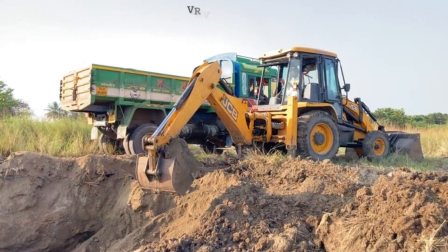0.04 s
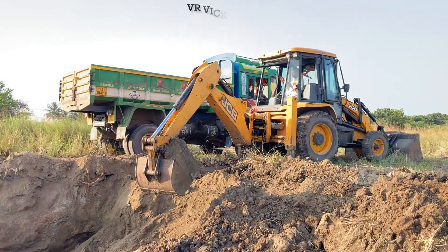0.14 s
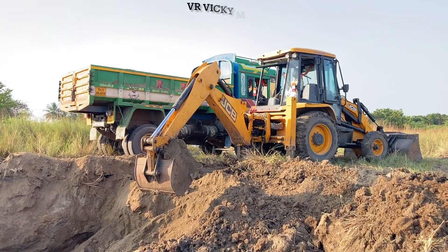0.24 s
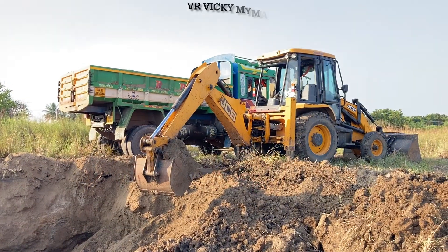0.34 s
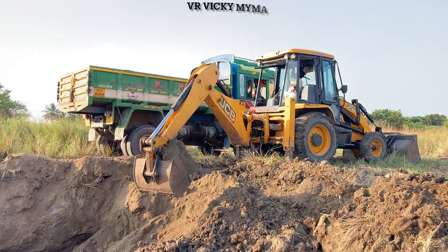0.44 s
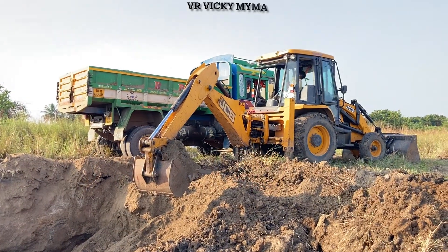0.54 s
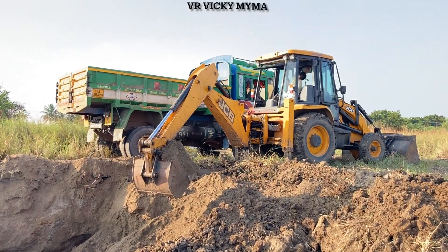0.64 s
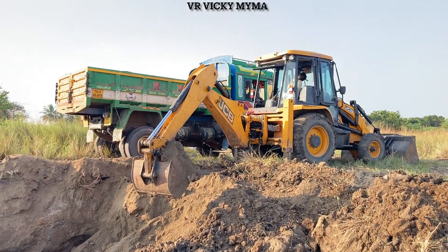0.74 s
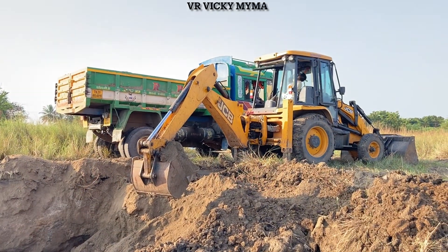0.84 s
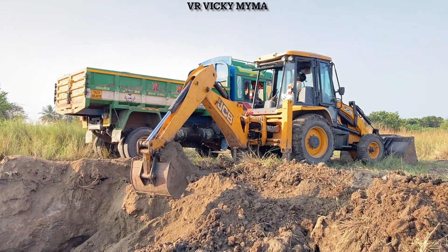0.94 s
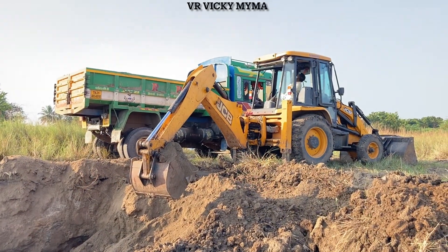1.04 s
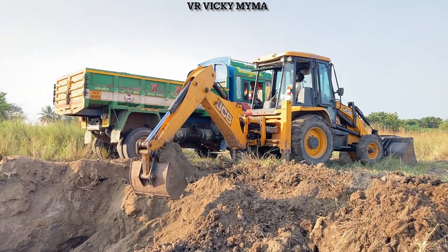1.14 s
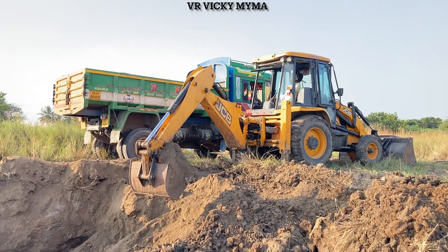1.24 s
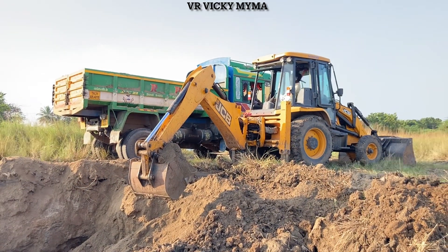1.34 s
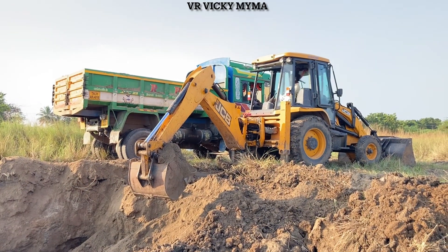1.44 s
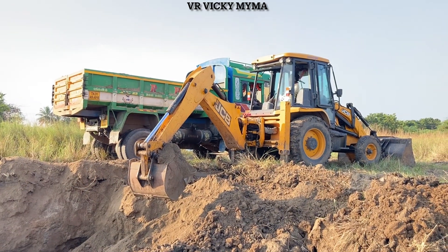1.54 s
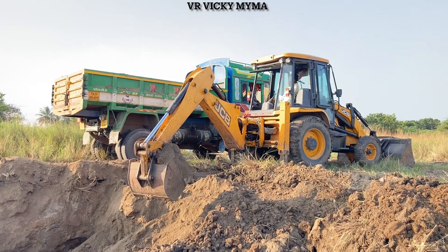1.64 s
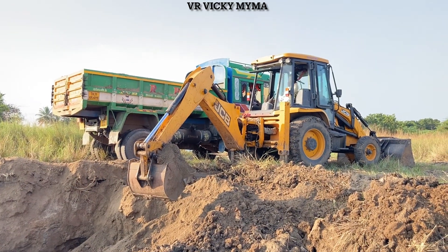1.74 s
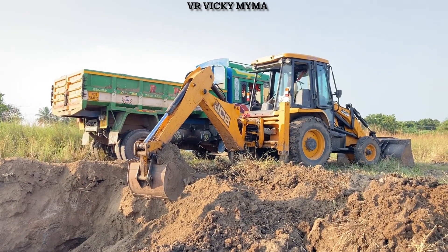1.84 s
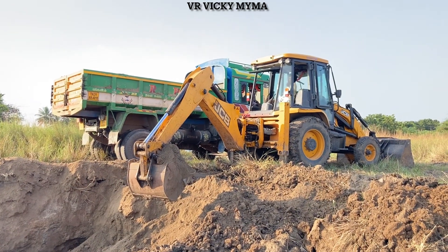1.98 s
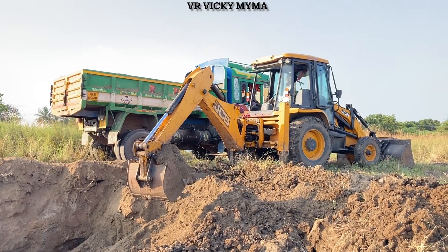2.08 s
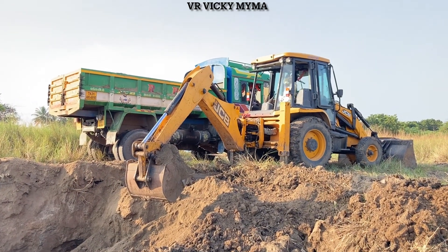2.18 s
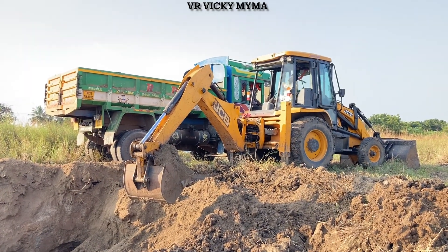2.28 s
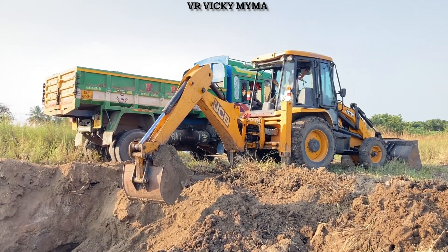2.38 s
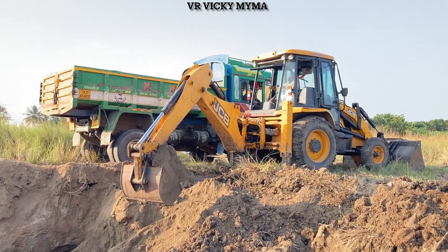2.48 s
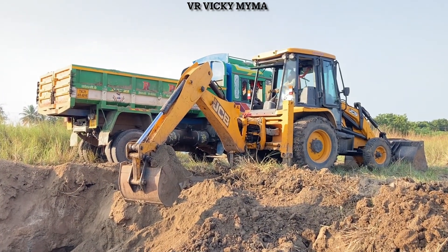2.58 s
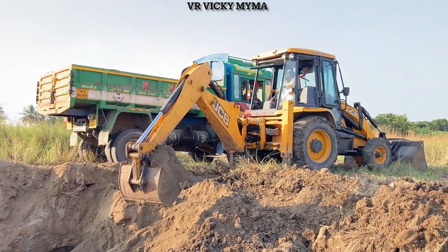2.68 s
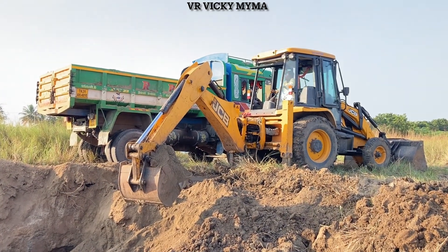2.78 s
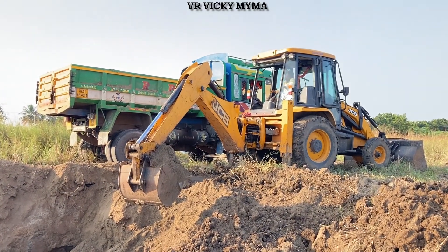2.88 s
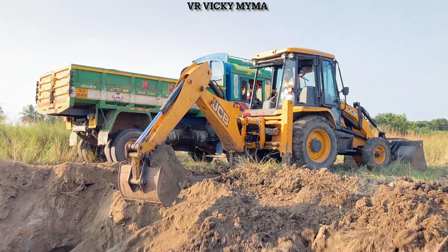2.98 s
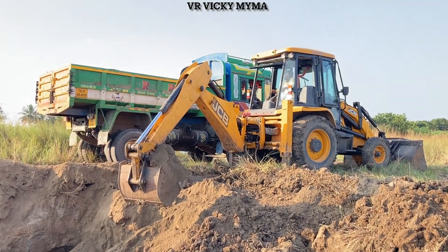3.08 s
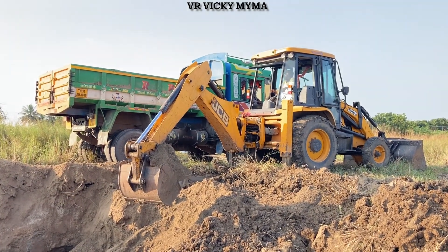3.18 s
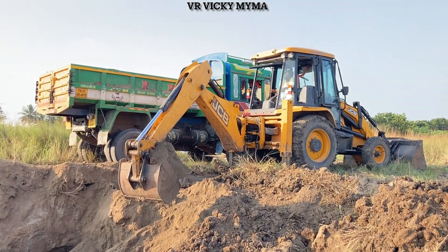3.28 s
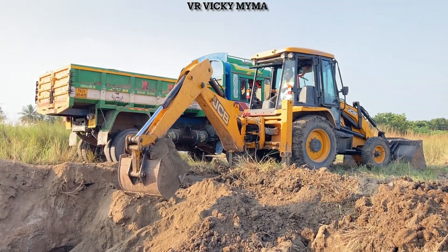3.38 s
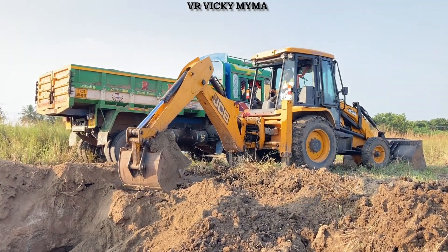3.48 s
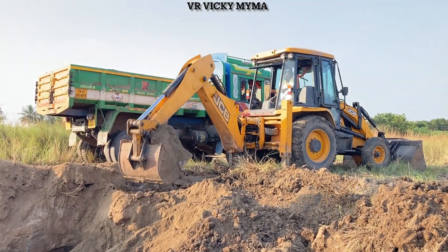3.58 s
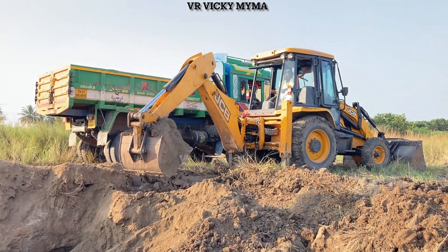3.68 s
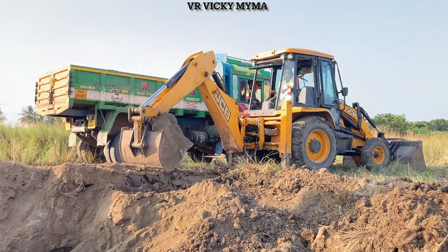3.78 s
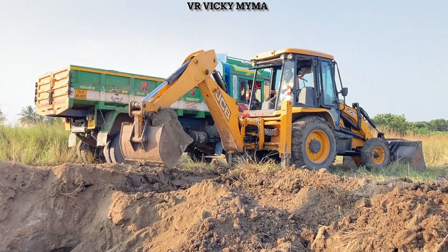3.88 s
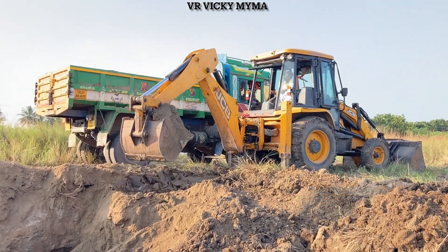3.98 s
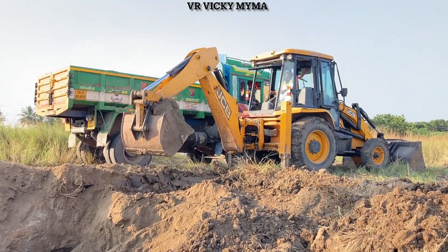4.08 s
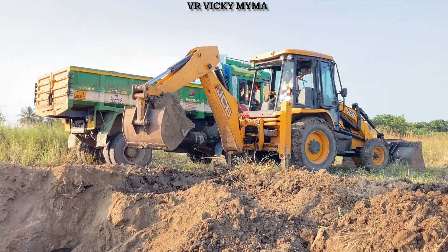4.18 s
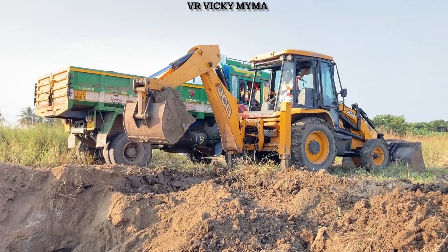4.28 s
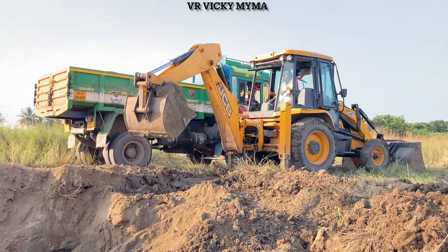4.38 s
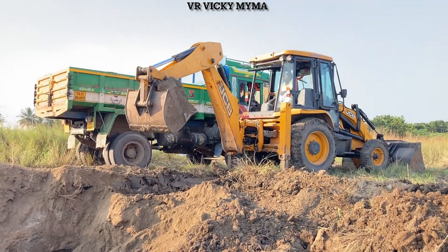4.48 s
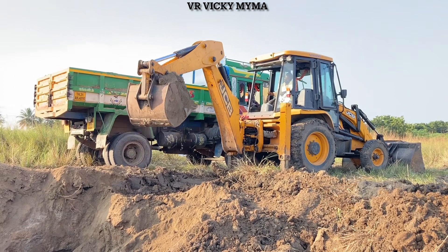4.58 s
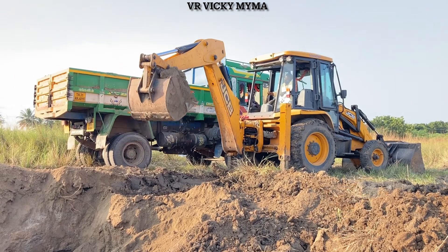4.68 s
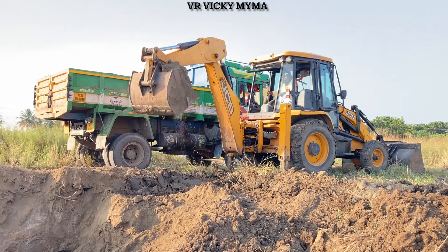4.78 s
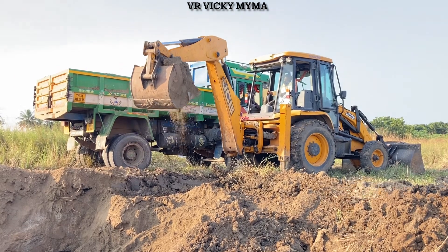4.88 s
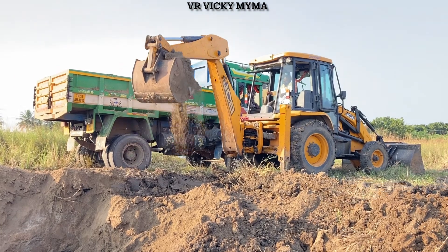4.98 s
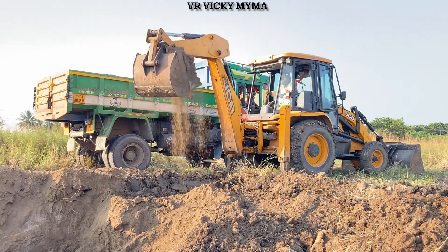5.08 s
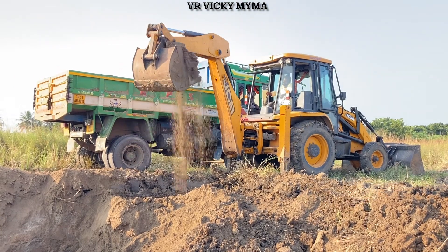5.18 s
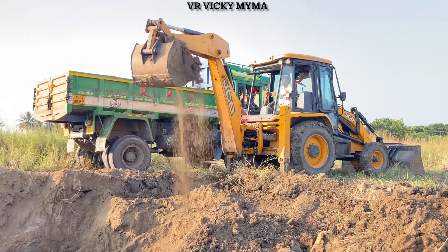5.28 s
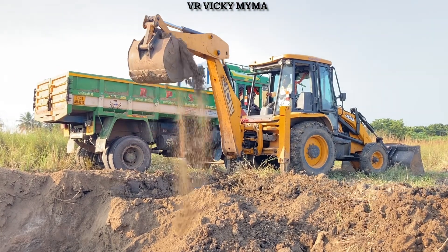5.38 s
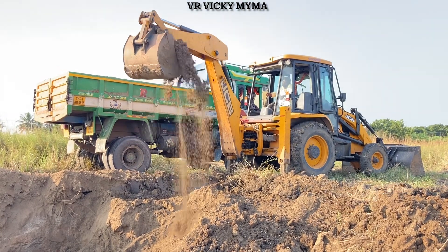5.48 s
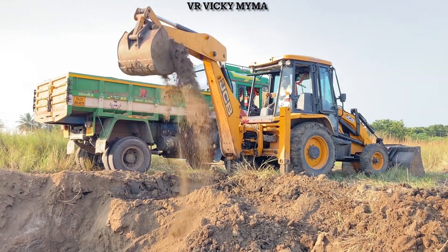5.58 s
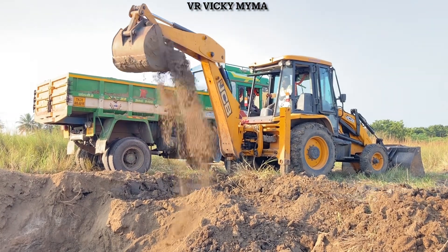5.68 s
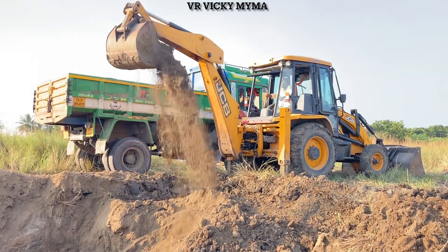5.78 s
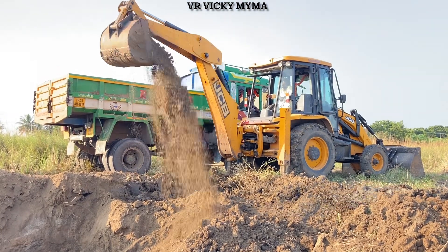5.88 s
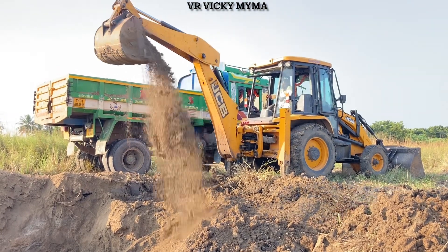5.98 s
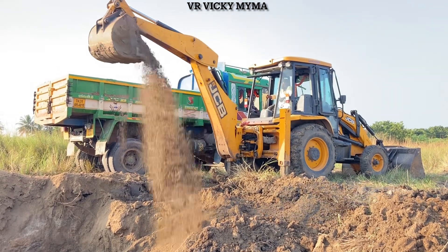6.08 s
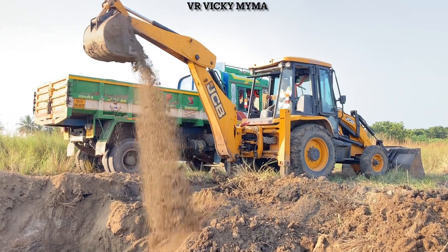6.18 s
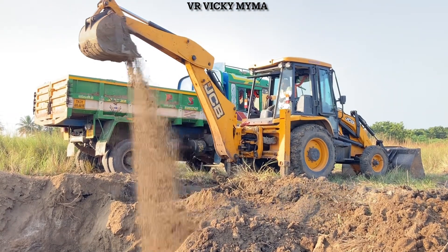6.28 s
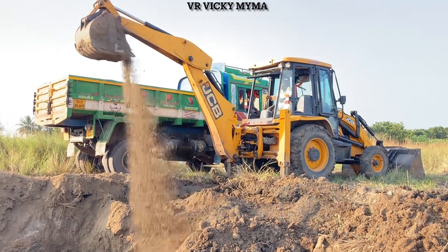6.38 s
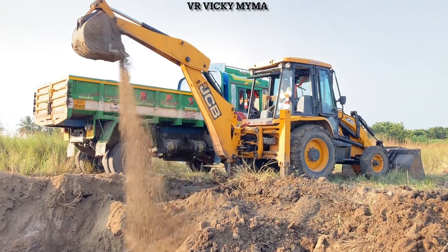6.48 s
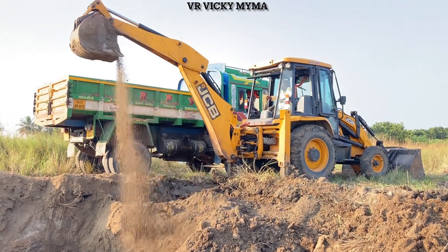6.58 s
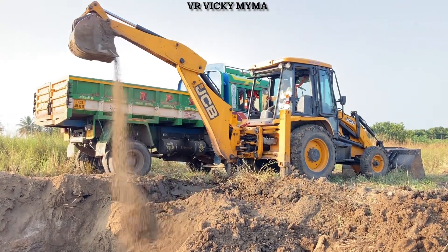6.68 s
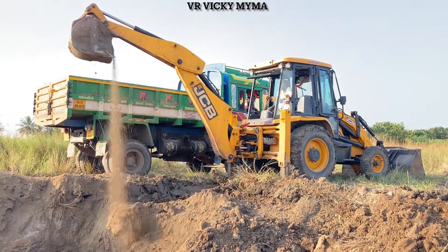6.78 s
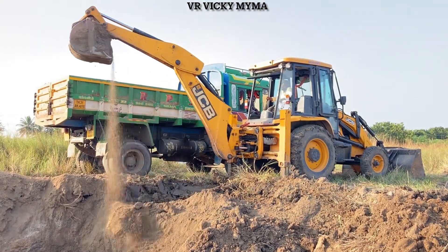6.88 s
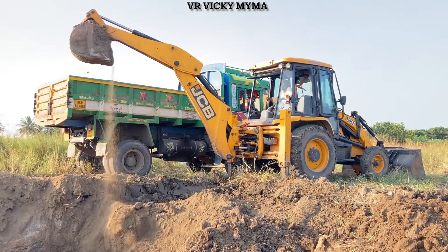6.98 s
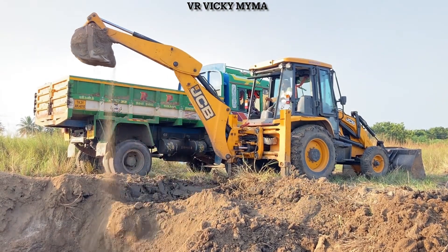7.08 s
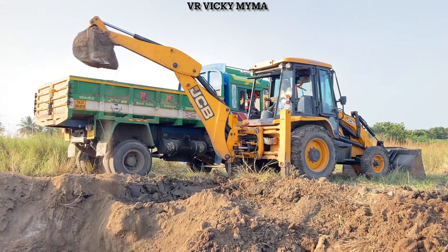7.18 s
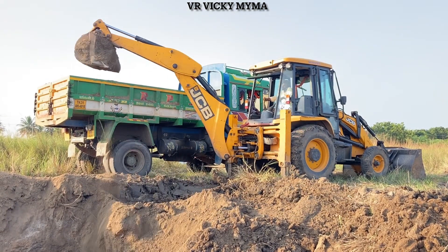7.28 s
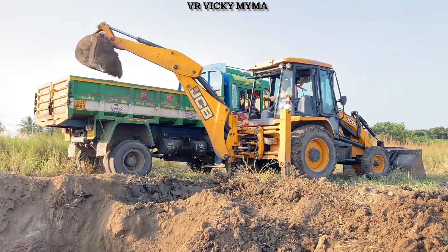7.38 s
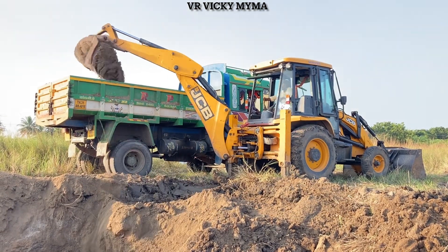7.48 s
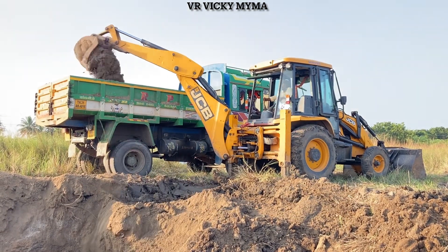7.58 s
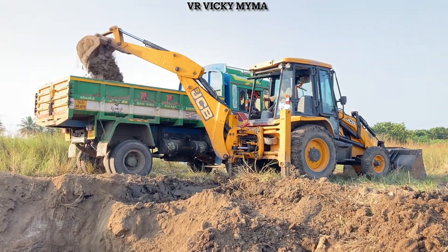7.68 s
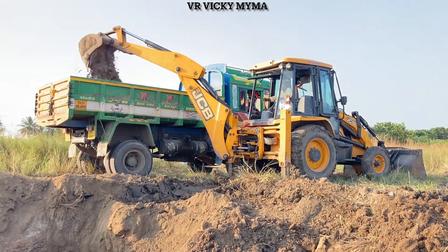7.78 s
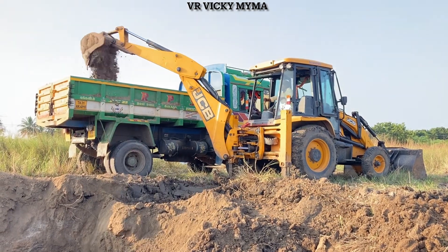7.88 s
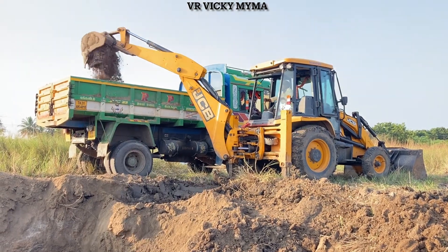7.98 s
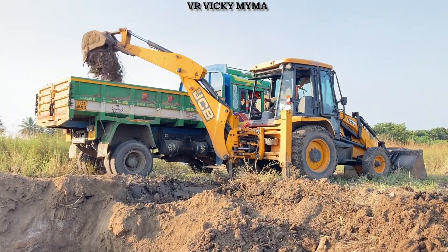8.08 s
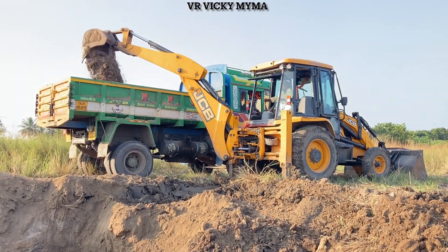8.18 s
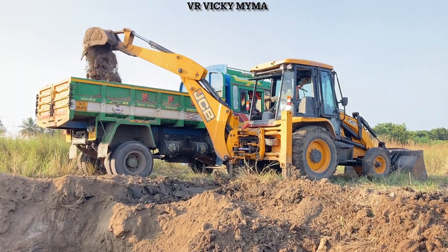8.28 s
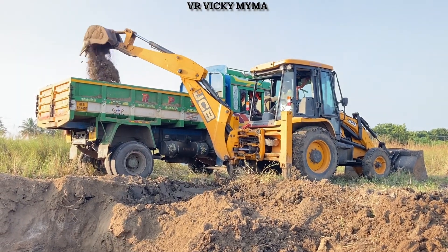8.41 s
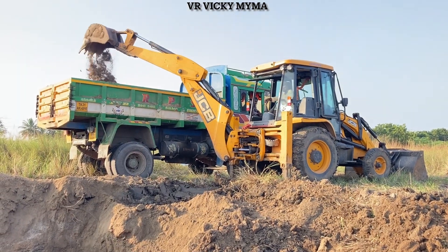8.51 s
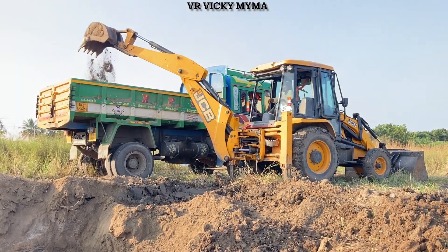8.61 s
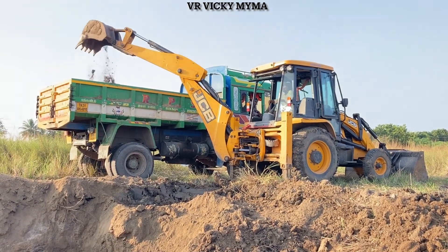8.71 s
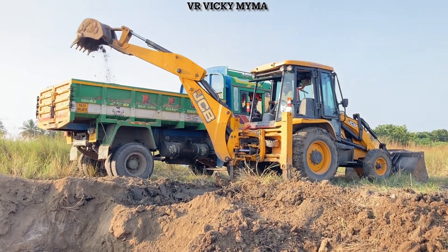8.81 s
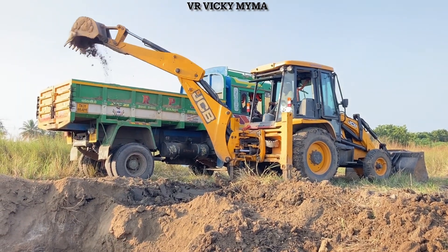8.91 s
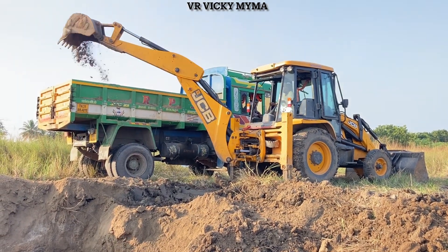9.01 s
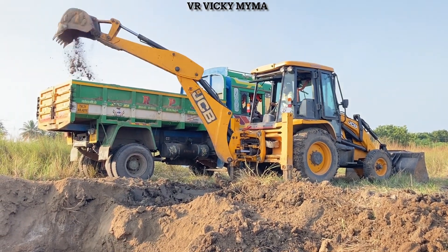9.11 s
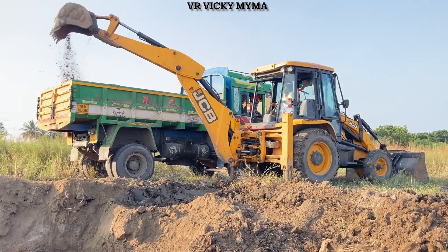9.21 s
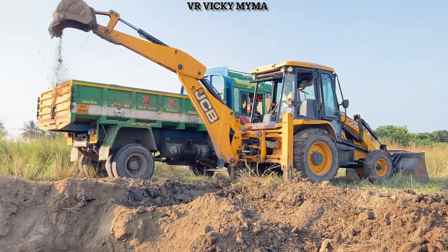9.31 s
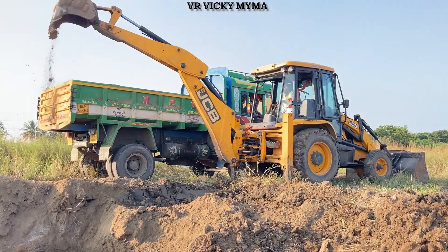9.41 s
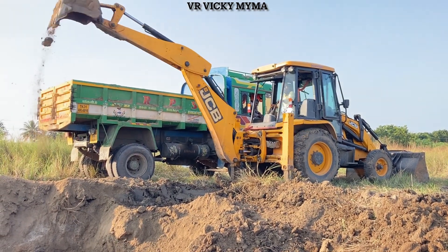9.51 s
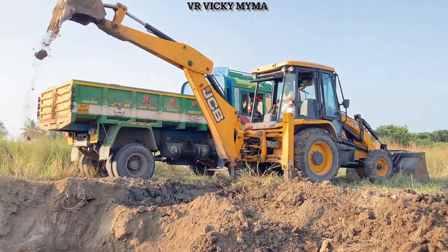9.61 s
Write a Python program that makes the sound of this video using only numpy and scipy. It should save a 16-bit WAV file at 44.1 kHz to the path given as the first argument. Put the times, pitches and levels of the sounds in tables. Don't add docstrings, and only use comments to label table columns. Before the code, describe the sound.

A backhoe's diesel idles in an open field, then lugs down and deepens lifting earth, before clods thud, crunch and clang into a steel truck bed.

```python
import sys
import numpy as np
from scipy import signal
from scipy.fft import rfft, irfft, next_fast_len
from scipy.io import wavfile
from scipy.ndimage import uniform_filter1d

SR = 44100
rng = np.random.default_rng(int(sys.argv[2]) if len(sys.argv) > 2 else 0)


def decibels_to_gain(level_db):
    exponent = np.asarray(level_db, float) / 20
    return 10 ** exponent


def dump(signal):
    limited = np.clip(np.atleast_2d(signal).T, -1, 1)
    pcm = np.round(limited * 32767).astype(np.int16)
    wavfile.write(sys.argv[1], SR, pcm)


N = 425565
T, HZ = np.arange(N) / SR, np.fft.rfftfreq(next_fast_len(N), 1 / SR)

# t/s, firing rate f/Hz, fuel [0-1], pump pressure [0-1]
ENGINE_WORK = [(0, 54.18, 0, 0.06), (3.04, 54.6, 0.02, 0), (3.2, 49.82, 0.28, 0.5),
               (3.33, 48.77, 0.63, 0.6), (3.5, 48.7, 0.99, 0.71), (3.75, 51.6, 0.58, 0.52),
               (3.9, 50.3, 0.44, 0.5), (4.08, 49.87, 0.7, 0.6), (4.9, 50.14, 0.68, 0.76),
               (5.3, 50.69, 0.56, 0.37), (5.75, 50.92, 0.54, 0.2), (7.13, 49.87, 0.86, 0.2),
               (7.3, 51.9, 0.59, 0.07), (8.6, 51.6, 0.27, 0.3), (8.73, 49.32, 0.8, 0.6),
               (9.05, 48.86, 1, 0.73), (9.22, 51.88, 0.92, 0.4), (9.55, 52.2, 0.65, 0)]
# multiple of the firing rate [1], level/dB under order 1
UNEVEN_ORDERS = [(.75, -30), (1.25, -39), (1.5, -21.5), (1.75, -27), (2.5, -29), (3.25, -22), (3.75, -18.5),
                 (4, -47), (5, -28), (10.5, -22), (11, -24.5)]
# multiple of the firing rate [1], level/dB
GEAR_ORDERS = [(3.75, -42), (6.5, -41), (9.75, -47.5), (10.25, -69), (12, -60), (13, -52.5), (15, -60),
               (18, -51.5), (19, -57), (20, -55), (23, -65), (24.5, -59.5), (26, -55), (28, -54), (30, -56)]
# f/Hz, level/dB per Hz
RUMBLE_SPECTRUM = [(30, -17), (70, 3.5), (130, 0.5), (200, 6.5), (300, 4.5), (430, 0.5), (700, -7),
                   (1400, -41)]
# f/Hz, level/dB per Hz
KNOCK_SPECTRUM = [(400, -61), (650, -4.5), (1200, -3.5), (1700, -7), (2050, -9), (2500, -14.5), (3200, -39),
                  (4500, -40)]
# f/Hz, level/dB per Hz
HISS_SPECTRUM = [(1800, -5), (2600, 0.5), (4300, -1.5), (5300, -6.5), (6400, -7.5), (7600, -4.5),
                 (9500, -1), (12400, -7.5), (15000, -1.5), (15800, -0.5)]
# f/Hz, width/Hz, level/dB
BODY_MODES = [(347.4, 26, -8), (522.6, 65, -8), (474, 83, -13.5)]
# f/Hz, width/Hz, level/dB
BLOCK_MODES = [(975, 210, -5), (1530, 200, -14), (1865, 120, -19)]
# f/Hz, width/Hz, level/dB
SILENCER_MODES = [(352, 29, 1), (545, 34, -6), (272, 61, -13.5), (766, 54, -8.5)]
# t/s, level/dB, f/Hz
HARD_BLOWS = [(3.302, -26, 942), (3.384, -21, 942), (3.531, -27, 890), (3.547, -24, 888), (3.705, -29, 980),
              (4.1, -26, 915), (4.22, -28, 937), (4.577, -27, 910), (4.658, -25, 974), (4.738, -25, 923),
              (4.816, -24, 964), (4.898, -23, 970), (4.977, -24, 912), (5.057, -21, 975), (5.135, -29, 990),
              (5.217, -30, 977), (5.333, -30, 926), (5.452, -33, 934), (5.611, -31, 953), (6.199, -30, 974),
              (6.239, -28, 1030), (6.318, -21, 912), (6.436, -28, 912), (6.515, -30, 918),
              (6.638, -23, 960), (6.794, -29, 888), (6.875, -21, 955), (6.955, -21, 947), (7.015, -24, 942),
              (7.075, -23, 953), (8.909, -26, 955), (9.068, -20, 960)]
# t/s, level/dB, f/Hz
PIN_KNOCKS = [
    (1.3, -26, 531),
    (1.959, -26, 520),
    (4.977, -28, 545),
]
# t/s, length/s, f/Hz, width/Hz, level/dB
BEARING_SCRAPE = [
    (3.47, .16, 3900, 900, -48),
    (3.485, .1, 3850, 220, -47),
    (3.485, .07, 6300, 200, -53),
]
# t/s, length/s, f/Hz, level/dB, swell/s, fade/s
VALVE_WHISTLES = [
    (5.66, 1.22, 1517, -41.5, .4, .14),
    (5.45, .58, 1832, -50, .3, .06),
]
# t/s, middle level/dB, bass level/dB,
# treble level/dB, crumbling/s
CLODS = [(2.1308, -51, -33, -42.5, 0.014), (3.4994, -36, -57, -42, 0.037), (3.5612, -37, -31, -57, 0.022),
         (7.067, -33, -28, -44, .01), (7.166, -38, -23, -32, 0.0092), (7.174, -40, -30, -45, 0.009),
         (7.182, -36, -27, -27, 0.0087), (7.195, -38, -22, -47, .008), (7.249, -23, -22, -43, 0.004),
         (7.258, -33, -29, -47, .014), (7.294, -41, -32, -50, .005), (7.479, -56, -35, -41, 0.036),
         (7.558, -43, -21.5, -52, 0.015), (7.583, -38, -34, -44, .012), (7.607, -36, -32, -57, 0.033),
         (7.6898, -20, -18, -28, 0.007), (7.7, -23, -19.5, -32, 0.0076), (7.719, -27, -22, -47, 0.0052),
         (7.728, -26, -28, -34.5, 0.016), (7.7698, -40, -43, -40, 0.017), (7.929, -32, -20, -33, 0.0073),
         (7.945, -40, -31, -36, 0.0093), (8.15, -38, -25.5, -44, 0.035), (8.542, -23.5, -20.5, -46, .012),
         (8.565, -39, -33, -57, 0.0065), (8.69, -45, -41, -37, 0.014), (8.7043, -40, -32, -41, .01),
         (8.717, -37, -25.5, -43, 0.032), (8.775, -26, -31, -33, 0.0049), (8.782, -35, -23.5, -40, 0.035),
         (8.838, -22.5, -30, -36, 0.012), (9.21, -29, -20.5, -55, 0.018),
         (9.29, -40, -60, -43.5, .23), (9.5355, -16, -29, -20.5, 0.0044), (9.548, -27, -26, -40, 0.0045),
         (9.555, -30, -30, -42, 0.0044), (9.573, -27, -29, -39, .006), (9.589, -20, -19, -41, .006),
         (9.614, -28, -33, -37, .004), (9.619, -27, -33, -34, .004), (9.644, -29, -31, -41, .005),
         (9.5407, -19, -23, -39, 0.0079), (9.562, -29, -24, -47, 0.01), (9.581, -35, -35, -46, 0.0057),
         (9.598, -20, -25, -29, 0.0063), (9.607, -36, -36, -38, 0.0051), (9.625, -26, -36, -32, .004),
         (9.6311, -13, -37, -32, .001), (9.637, -30, -33, -46, 0.0076)]
# t/s, f/Hz, level/dB, t60/s
STONES = [(7.069, 4400, -34, .07), (7.181, 7890, -22, .09), (7.576, 4200, -33, .03),
          (7.575, 6400, -34, .03), (7.693, 1340, -25, .04), (7.703, 3500, -26, .04),
          (7.692, 4200, -30, .03), (7.186, 3117, -26, .1), (7.184, 12130, -27, .05),
          (7.173, 2300, -25, .06), (7.252, 1110, -23, .09), (7.252, 3400, -32, .03),
          (8.843, 1790, -27, .06), (8.782, 1240, -26, .08), (7.184, 4300, -32, .04),
          (7.478, 9950, -33, .07), (7.574, 7300, -29, .05), (7.707, 7500, -25, .03),
          (7.934, 5390, -31, .09), (7.945, 4000, -34, .04), (7.194, 1020, -25, .06), (7.262, 930, -26, .08),
          (7.562, 760, -27, .1), (7.586, 900, -29, .07), (7.733, 350, -19, .08), (7.708, 430, -21, .05),
          (7.31, 950, -29, .07), (8.15, 4200, -36, .08), (8.547, 1100, -25, .1), (8.544, 3600, -29, .06),
          (8.547, 1800, -31, .1), (8.782, 1990, -26, .06), (8.781, 3000, -31, .1), (9.27, 735, -28, .25),
          (9.538, 7600, -24, .05), (9.6033, 247, -12.5, .6), (8.795, 520, -22, .06),
          (8.785, 3550, -27, .08), (8.785, 7000, -31, .04), (8.842, 7000, -31, .03), (9.607, 430, -21, .08),
          (9.585, 950, -22, .08), (9.604, 680, -22, .08), (9.539, 3100, -24, .05), (9.543, 1500, -22, .04),
          (9.222, 2350, -29, .1), (9.543, 4500, -26, .05), (9.599, 4200, -28, .06),
          (9.6315, 4600, -20, .02), (7.701, 160, -27, .2), (9.6315, 3200, -19, .04),
          (9.635, 2300, -24, .08)]
# f/Hz, level/dB per Hz
THUD_SPECTRUM = [(90, 7), (200, 14.5), (500, 11.5), (1000, 5.5), (1900, -4), (2600, -25)]
# f/Hz, level/dB per Hz
CRUNCH_SPECTRUM = [(700, -11), (1000, 7), (1600, 7.5), (2400, 8), (3600, 5.5), (3850, 4), (5000, -17),
                   (9000, -62)]
# f/Hz, level/dB per Hz
GRIT_SPECTRUM = [(3000, -20), (4400, 6.5), (5400, 6.5), (6500, 4.5), (8000, 8.5), (11000, 2.5),
                 (13000, -10), (15800, -22)]
# f/Hz, lead/half turns
ENGINE_LEAD = [(0, 0.0047), (1500, 0.15), (2600, 0.43), (3600, 0), (5000, 0.33), (5500, 0.72), (6000, 1.2)]
# f/Hz, lead/half turns
TRUCK_LEAD = [(0, -0.055), (2000, -0.41), (4000, -0.62), (4800, -0.46), (6000, -1.1)]
# f/Hz, lead/half turns
TREBLE_LEAD = [(6750, 2), (7000, 2), (8900, 3), (9360, 3), (11100, 4), (11600, 4), (13330, 5), (13920, 5),
               (15600, 6)]
# f/Hz, level/dB
SIDE_SCATTER = [(60, -22), (300, -50), (700, -10), (1500, -34), (3000, -5.5), (5000, -5), (6300, -36),
                (8000, -50)]
# f/Hz, level/dB
MID_SCATTER = [(4300, -52), (5100, -10), (6000, -2), (6800, -47)]
# f/Hz, left minus right level/dB
PORT_TILT = [(60, -3.5), (110, -5.5), (200, 0.5), (380, -1), (700, -0.3), (1290, 2.5), (2380, 2.5),
             (4400, -0.6)]
# f/Hz, level/dB
GROUND_ECHO = [(1850, 0), (2070, -4), (2250, 0)]

# (dB at idle, dB as the load comes on, dB at full fuel, dB at full pump pressure)
ORDER_1, ORDER_2, ORDER_3 = (-30.5, 1, 5.5, 0.5), (-42, 9.5, 7.5, 0.5), (-30.5, -8, 0.5, -0.5)
ORDER_6, ORDER_7 = (-37.5, -11, -3, 26), (-60.5, 17, 7.5, -3)
RUMBLE_LAW, KNOCK_LAW, HISS_LAW = (-31.5, -0.5, 4, -0.3), (-41.5, -0.25, 5, 1), (-48, 0.23, 3, -1.4)
BLOW_LAW = (-52, 5.5, 9.5, 1.5)
BITE, PIPE_BITE = .33, 0.9
PIPE_HZ, PIPE_WIDTH_HZ = 348.6, 5.9
LOUD_FIRING_S, LOUD_DB = 4.976, 3.5
PING_HZ, PING_WIDTH_HZ, PING_DB = 950, 170, -15
HARD_TRIM_DB = -1.5
SWELL_DB, SHARP = -24, .005
SAG_HZ_PER_S = 15
BED_T60_S, LAND_S = .11, 0.00083
EDGE_HZ = 15780
KNEE, CEILING = .45, .3


def evened(x):
    return x / np.sqrt(np.mean(x ** 2) + 1e-20)


def read(points, hz):
    f, value = np.transpose(points)
    return np.interp(np.log(hz + 1), np.log(f + 1), value)


def curves(rows):
    s, *columns = np.transpose(rows)
    return [np.interp(T, s, c) for c in columns]


def slow_amp(db):
    return np.repeat(decibels_to_gain(db[::32]), 32)[:N]


def wander(per_s):
    count = int(N / SR * per_s) + 2
    return evened(np.interp(T, np.arange(count) / per_s, rng.standard_normal(count)))


def colour(x, points):
    size = next_fast_len(N)
    spectrum = rfft(x, size) * decibels_to_gain(read(points, HZ))
    return evened(irfft(spectrum, size)[..., :N])


def ring(x, hz, width):
    b, a = signal.iirpeak(hz, hz / width, SR)
    return evened(signal.lfilter(b, a, signal.lfilter(b, a, x)))


def mottle(x, depth_db, frames):
    z = signal.stft(x, nperseg=256, noverlap=128)[2]
    patches = evened(uniform_filter1d(rng.standard_normal(z.shape[1:]), frames, axis=1))
    patched = signal.istft(z * decibels_to_gain(depth_db * patches), nperseg=256, noverlap=128)[1]
    return evened(patched[:, :N])


def rings(rows, rise):
    out = np.zeros(N)
    for s, hz, db, t60 in rows:
        at = slice(round(s * SR), round(s * SR) + SR // 2)
        u = T[at] - s
        envelope = decibels_to_gain(db - 60 * u / t60) * np.clip(u / rise, 0, 1)
        out[at] += envelope * np.sin(2 * np.pi * hz * u)
    return out


def ports(pair, lead, alike):
    hz, half_turns = np.transpose(lead + TREBLE_LEAD)
    angle = np.interp(HZ, hz, half_turns) * np.pi / 2
    a, b = rfft(pair, next_fast_len(N))
    alike = np.clip(alike, 0, 1)
    mid = np.cos(angle) * a + decibels_to_gain(read(MID_SCATTER, HZ)) * b
    shared = alike * a + np.sqrt(1 - alike ** 2) * b
    side = -1j * np.sin(angle) * shared + decibels_to_gain(read(SIDE_SCATTER, HZ)) * b
    return np.array([mid + side, mid - side])


def scrape():
    out, rub = np.zeros(N), rng.standard_normal(N)
    for s, length, hz, width, db in BEARING_SCRAPE:
        u = np.clip((T - s) / length, 0, 1)
        out += decibels_to_gain(db) * ring(rub, hz, width) * np.sqrt(u) * (1 - u) * 2.0
    return out


def pins():
    knocks = PIN_KNOCKS + [(s, db + HARD_TRIM_DB, hz) for s, db, hz in HARD_BLOWS]
    out = np.zeros(N)
    for ratio, trim_db, t60 in ((1, 2, 0.037), (1.62, -20, 0.0083), (2.7, -18, 0.018)):
        out += rings([(s, ratio * hz, db + trim_db, t60) for s, db, hz in knocks], rise=0.00035)
    return out


def valve():
    out = np.zeros(N)
    for s, length, hz, db, swell, fade in VALVE_WHISTLES:
        shut = np.clip(1 - (T - s) / swell, 0, 1)
        gate = (T > s) * np.clip((s + length - T) / fade, 0, 1)
        level = gate * decibels_to_gain(db + 4.5 + SWELL_DB * shut ** 2 + 0.49 * wander(27))
        pitch_hz = hz * (1 + SHARP * shut) - SAG_HZ_PER_S * (T - s - swell) + 2.5 * wander(30)
        out += level * np.sin(2 * np.pi * np.cumsum(pitch_hz) / SR)
    return out


def clinks():
    return rings(STONES, rise=0.00065)


def clods():
    roughness_db = 2.0 * uniform_filter1d(rng.standard_normal(N), 90) * np.sqrt(90)
    grains = decibels_to_gain(roughness_db) * rng.standard_normal((2, N))
    grains = mottle(grains, 2.2, 6)
    parts = [colour(grains, c) for c in (CRUNCH_SPECTRUM, THUD_SPECTRUM, GRIT_SPECTRUM)]
    out = np.zeros((2, N))
    for s, *blow_db, crumble in CLODS:
        at = slice(round(s * SR), round(s * SR) + SR // 2)
        u = T[at] - s
        for part, db, trim_db, longer in zip(parts, blow_db, (-6, -6, -3), (.9, 2.2, .6)):
            decay = decibels_to_gain(-60 * np.maximum(u - crumble, 0) / (BED_T60_S * longer))
            shape = np.clip(u / LAND_S, 0, 1) * decay
            out[:, at] += decibels_to_gain(db + trim_db) * shape * part[:, at]
    return out


def follow(law, fuel, pressure, bite=BITE):
    idle_db, bite_db, fuel_db, pump_db = law
    load_db = bite_db * np.clip(fuel / bite, 0, 1) ** 0.91
    return idle_db + load_db + fuel_db * fuel + pump_db * pressure


def firing_noise(turns, spectrum, modes, ring_db, steady, fade, uneven_db, patchy_db, loud_db=0):
    blow_db = uneven_db * (rng.random(700) - 3.0)[turns.astype(int)] + loud_db * (turns % 4 < 1)
    envelope = steady + decibels_to_gain(blow_db) * np.exp(-(turns % 1) / fade)
    puffs = envelope * rng.standard_normal((2, N))
    rung = sum(slow_amp(db + ring_db + 2.0 * wander(22)) * ring(puffs, hz, width) for hz, width, db in modes)
    return evened(colour(puffs, spectrum) + rung) * slow_amp(patchy_db * wander(10))


def ping(turns, free):
    force = decibels_to_gain(5 * rng.random(200))[(turns / 4).astype(int)]
    strikes = np.diff(np.floor(turns / 4), prepend=1) * force
    return ring(strikes, PING_HZ, PING_WIDTH_HZ) * (1 - 1.45 * free) * decibels_to_gain(PING_DB)


def pressure_blows(turns):
    force, late = rng.standard_normal((700, 2)).T
    fired = np.flatnonzero(np.diff(np.floor(turns)))
    which = turns[fired].astype(int)
    delay = (.0004 * SR * late[which]).astype(int)
    kicks = np.zeros(N)
    kicks[np.clip(fired + delay, 0, N - 1)] = decibels_to_gain(4.0 * force[which])
    return sum(slow_amp(db + 1.9 * wander(9)) * ring(kicks, hz, width) for hz, width, db in SILENCER_MODES)


def exhaust(turns, db1, db2, db3, db6, db7, free):
    # order, level in dB, waver in dB, phase in radians
    strong = [(1, db1, .45, 0), (2, db2, .9, .2), (3, db3, .8, .2), (6, db6, 1.1, .3), (7, db7, 1.5, .4)]
    weak = [(k, db1 + db - 14 * free * (k > 10), 3.6, k * k) for k, db in UNEVEN_ORDERS]
    gears = [(k, db - 15 * (1 - free), 2.4, k) for k, db in GEAR_ORDERS]
    out = np.zeros(N)
    for k, db, waver_db, phase in strong + weak + gears:
        out += slow_amp(db + waver_db * wander(14)) * np.sin(2 * np.pi * k * turns + phase)
    return np.sqrt(2) * out


def engine():
    rate, fuel, pressure = uniform_filter1d(curves(ENGINE_WORK), size=2000)
    free = np.clip(1 - fuel / BITE, 0, 1)
    turns = np.cumsum(rate + 0.06 * wander(6)) / SR
    turns = turns - (turns[round(LOUD_FIRING_S * SR)] - 4) % 4 + 4
    detuning = (7 * rate - PIPE_HZ) / PIPE_WIDTH_HZ
    in_tune_db = 3.0 - 10 * np.log10(1 + detuning ** 2) * (1 - free)
    ring_db = -7.5 * free

    rumble = firing_noise(turns, RUMBLE_SPECTRUM, BODY_MODES, ring_db,
                          steady=1.1, fade=.35, uneven_db=9, patchy_db=.7)
    knock = firing_noise(turns, KNOCK_SPECTRUM, BLOCK_MODES, ring_db, steady=.4, fade=.2,
                         uneven_db=6, patchy_db=.5, loud_db=LOUD_DB * (1 - .7 * free))
    knock = knock + ping(turns, free)
    hiss = firing_noise(turns, HISS_SPECTRUM, [], 0, steady=0.94, fade=0.43, uneven_db=3, patchy_db=.5)
    hiss = mottle(hiss, 2.14, 8)

    noise = slow_amp(follow(RUMBLE_LAW, fuel, pressure) - 0.77) * rumble
    noise = noise + slow_amp(follow(KNOCK_LAW, fuel, pressure) + 0.15) * knock
    noise = noise + slow_amp(follow(HISS_LAW, fuel, pressure) + 6.0) * hiss
    orders = [follow(law, fuel, pressure) for law in (ORDER_1, ORDER_2, ORDER_3, ORDER_6)]
    order_7 = follow(ORDER_7, fuel, pressure, PIPE_BITE) + in_tune_db
    tones = exhaust(turns, *orders, order_7, free)
    blow_db = follow(BLOW_LAW, fuel, pressure) + 0.56 * in_tune_db
    return tones + noise + slow_amp(blow_db) * pressure_blows(turns)


def scene():
    truck = ports(clods() + clinks(), TRUCK_LEAD, 0.98)
    machine = ports(engine() + valve() + pins() + scrape(), ENGINE_LEAD, 0.053)
    tilt = decibels_to_gain(np.outer([.5, -.5], read(PORT_TILT, HZ) * (HZ < 5000)))
    both = (machine + truck) * tilt * (HZ < EDGE_HZ) * decibels_to_gain(read(GROUND_ECHO, HZ))
    return irfft(both, next_fast_len(N))[:, :N]


def top_cut(x):
    return signal.sosfilt(signal.butter(12, 17130, fs=SR, output="sos"), x)


def record(dry):
    over = np.maximum(abs(dry) - KNEE, 0)
    excess = over - CEILING * np.tanh(over / CEILING)
    mix = dry - np.sign(dry) * excess
    return top_cut(mix)


dry = scene()
out = record(dry)
dump(out)
```